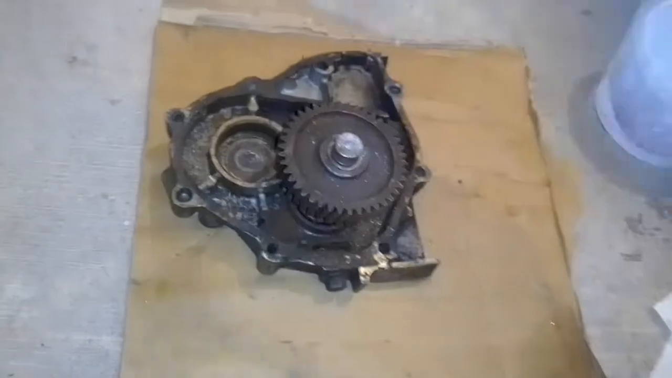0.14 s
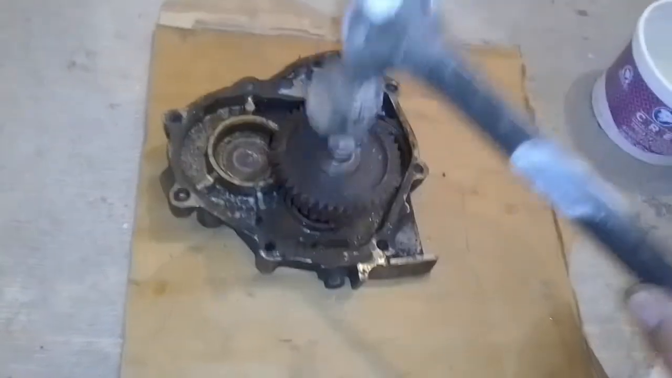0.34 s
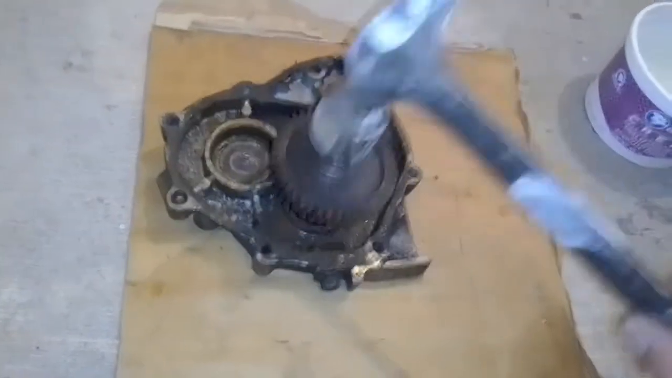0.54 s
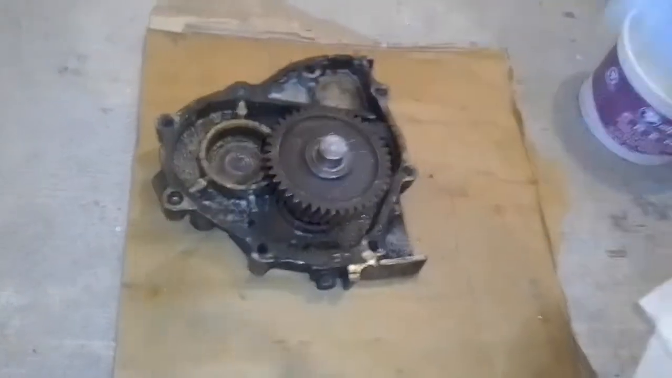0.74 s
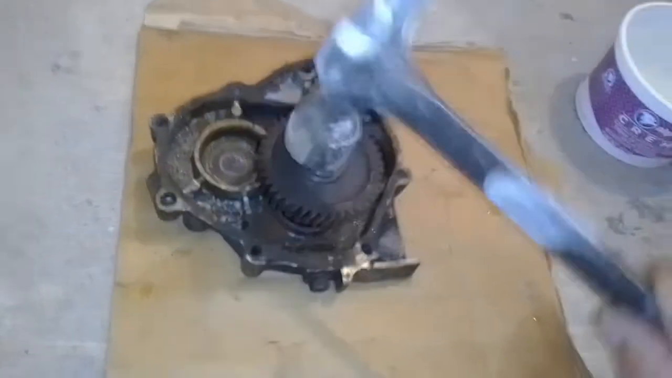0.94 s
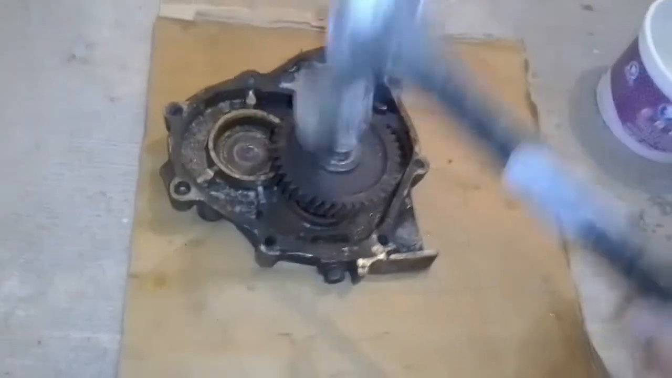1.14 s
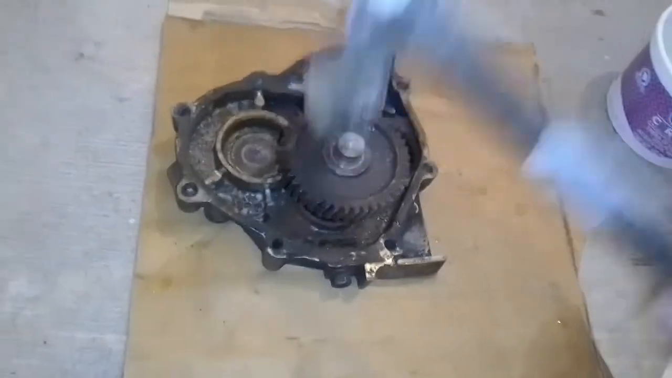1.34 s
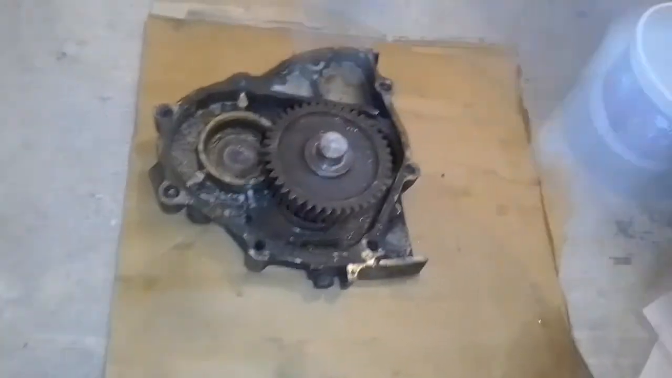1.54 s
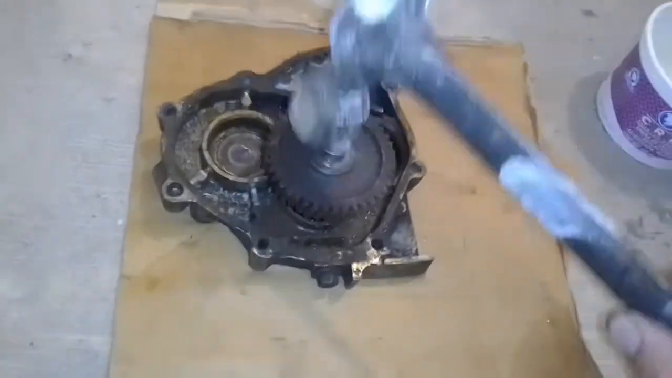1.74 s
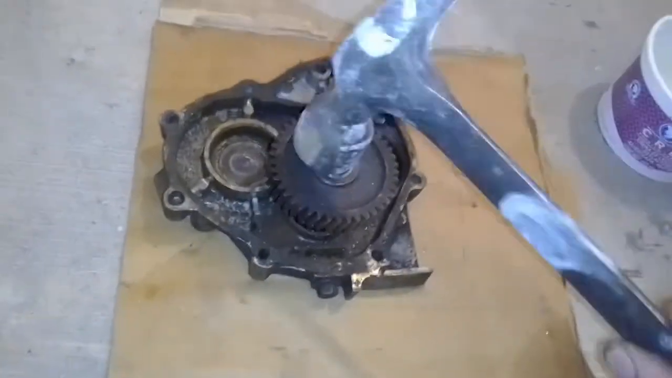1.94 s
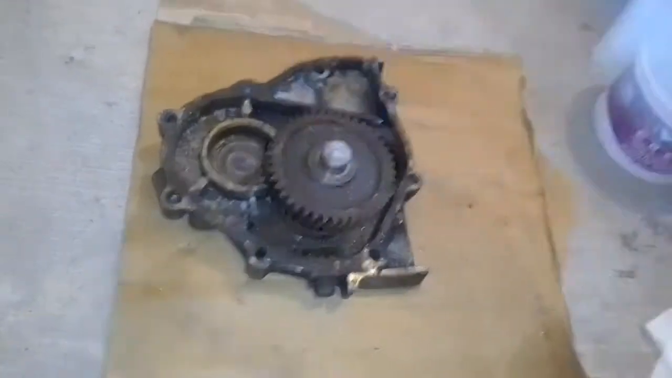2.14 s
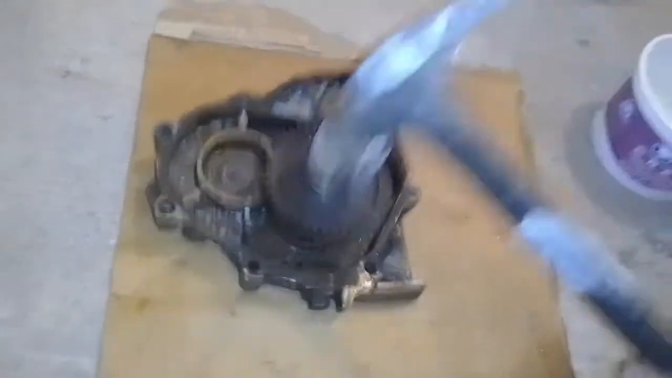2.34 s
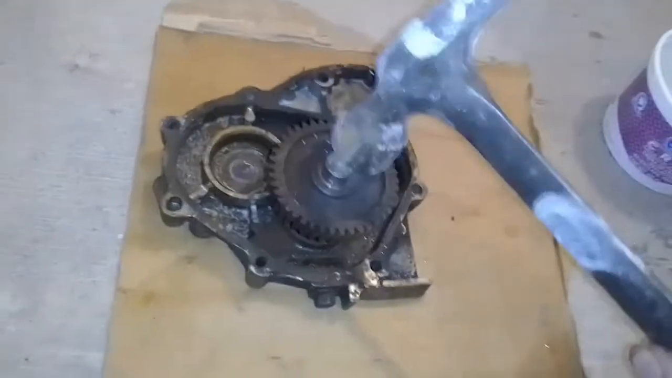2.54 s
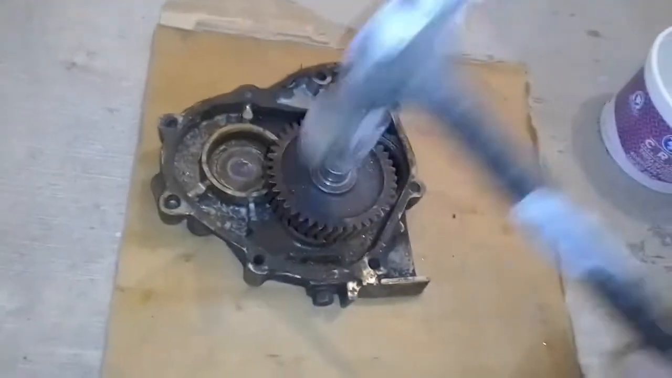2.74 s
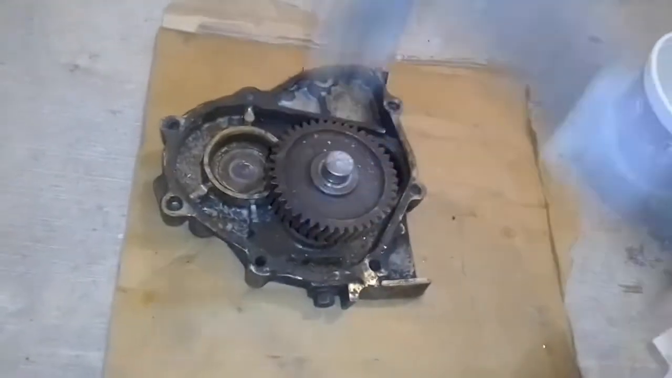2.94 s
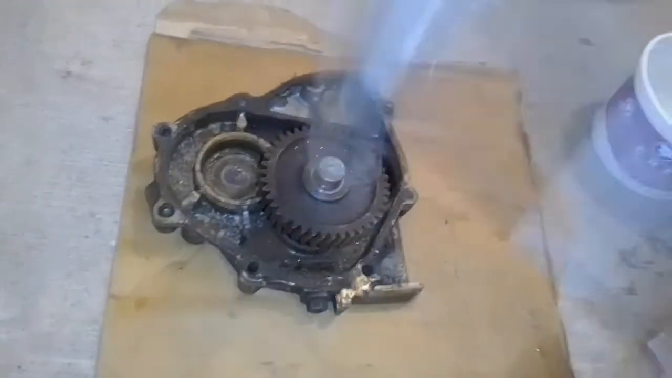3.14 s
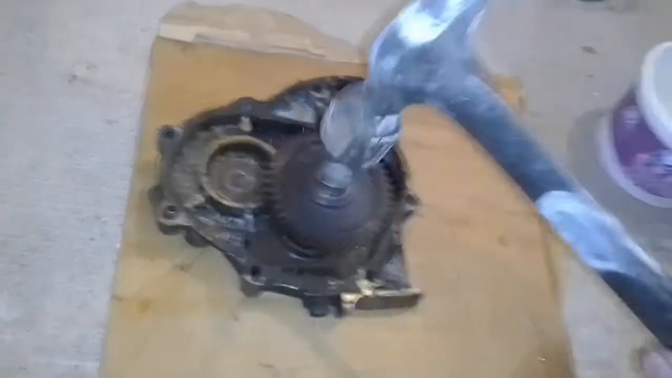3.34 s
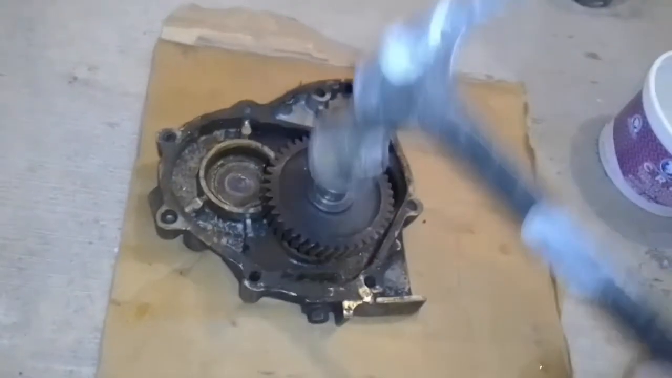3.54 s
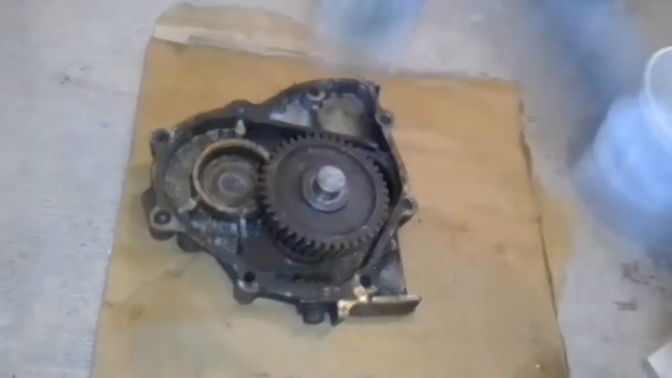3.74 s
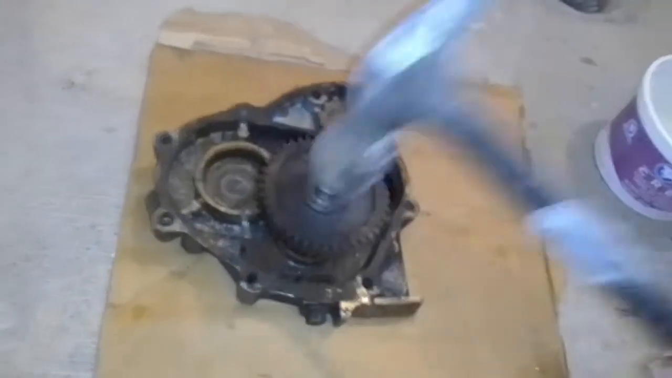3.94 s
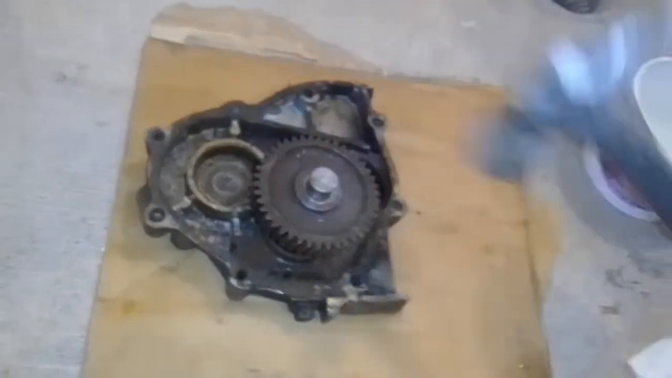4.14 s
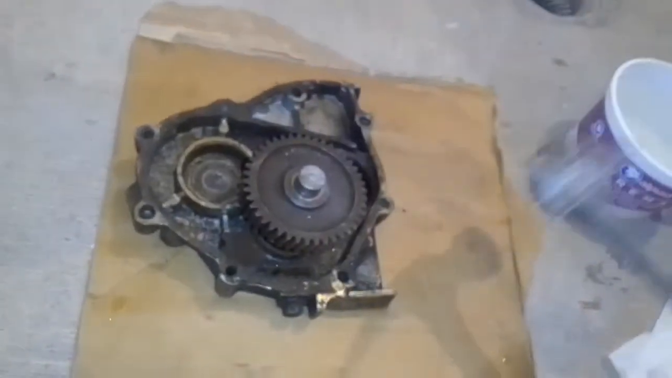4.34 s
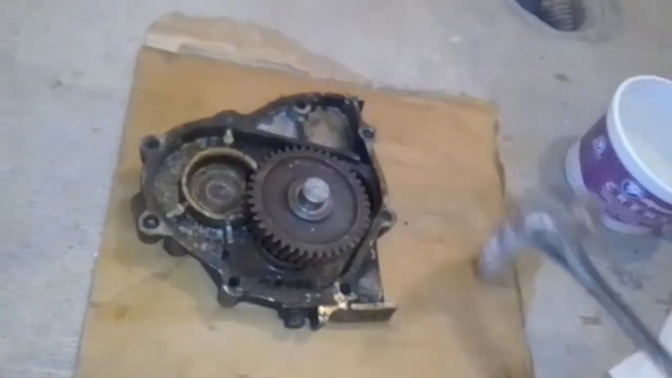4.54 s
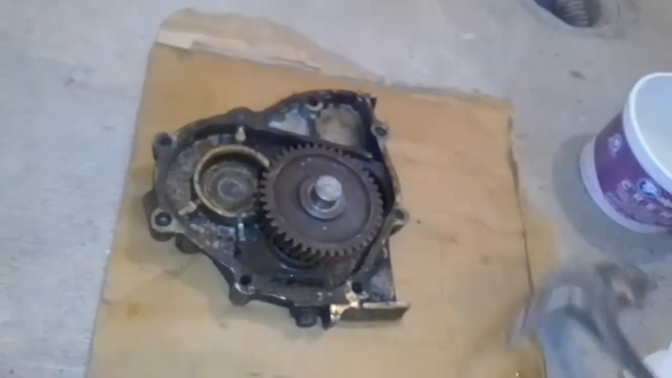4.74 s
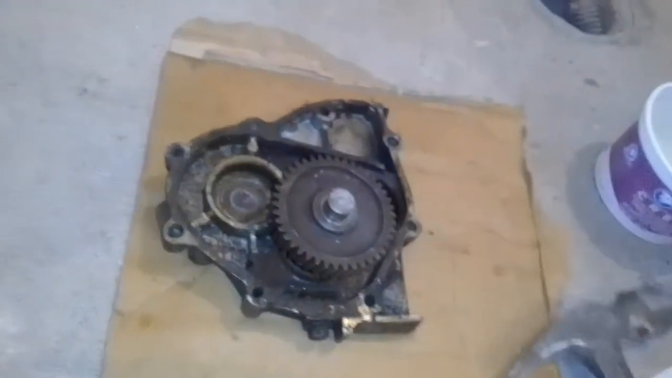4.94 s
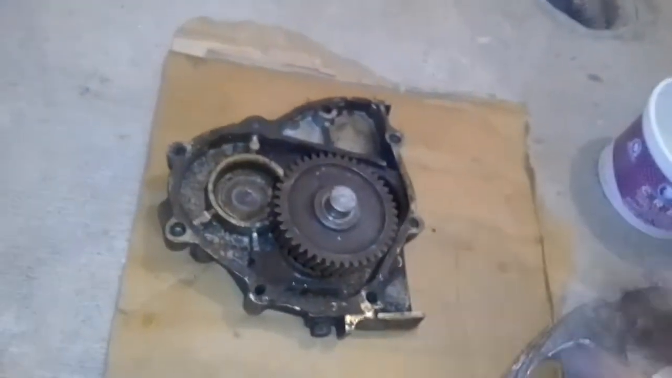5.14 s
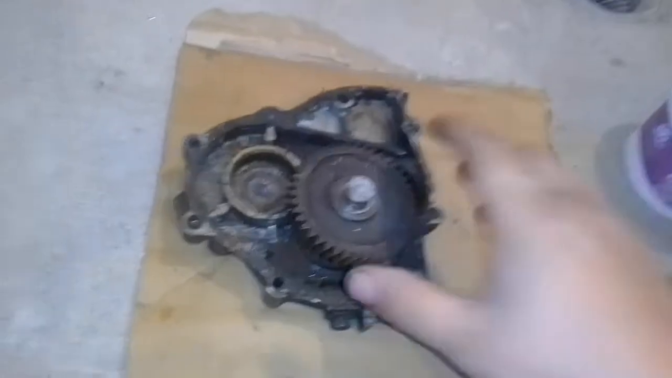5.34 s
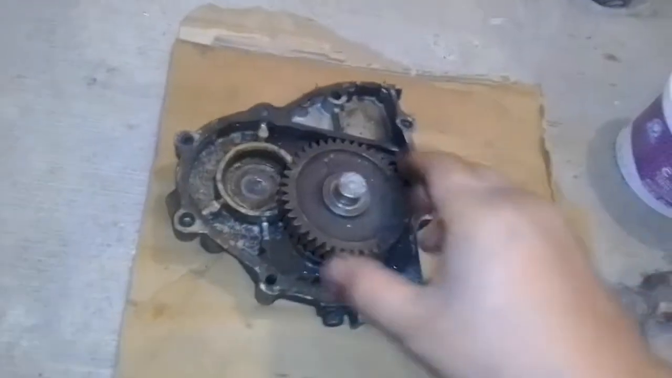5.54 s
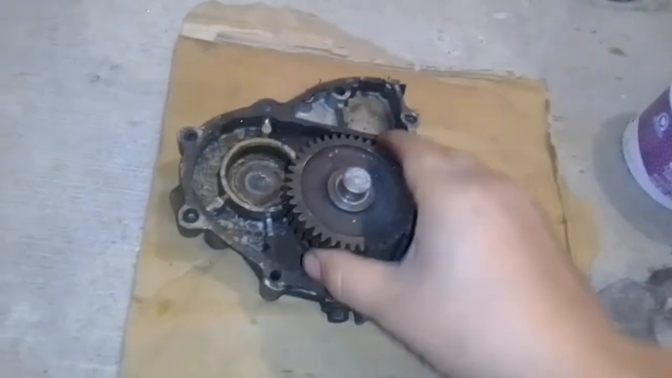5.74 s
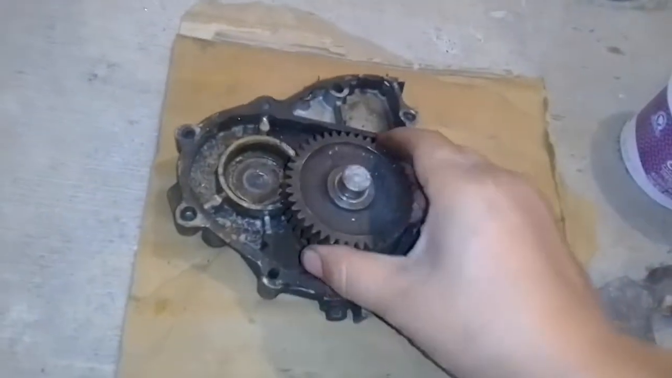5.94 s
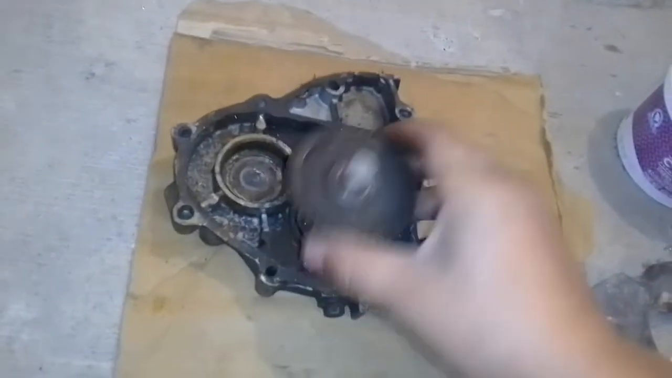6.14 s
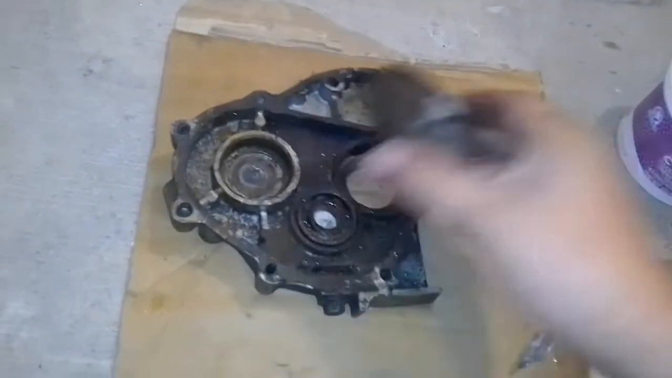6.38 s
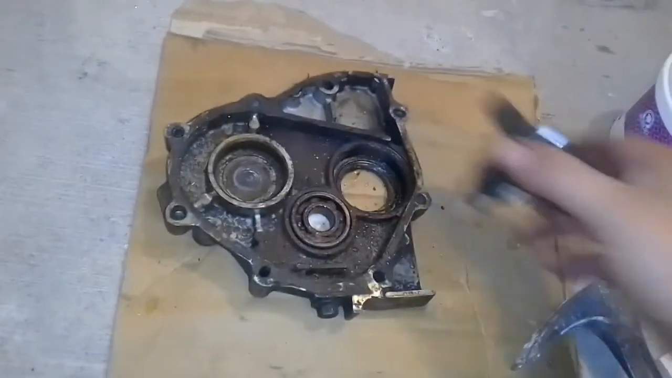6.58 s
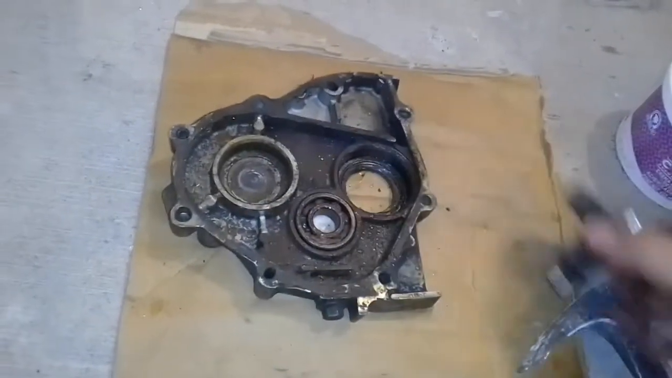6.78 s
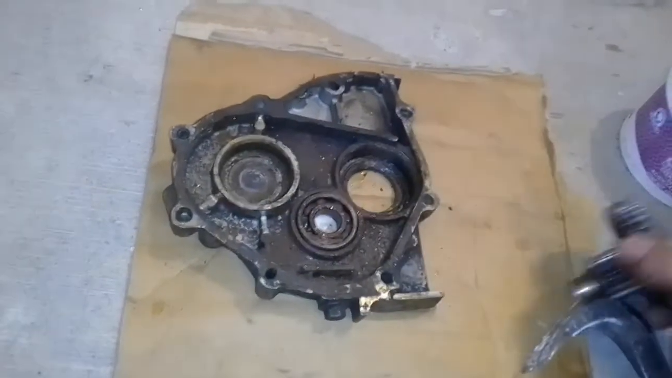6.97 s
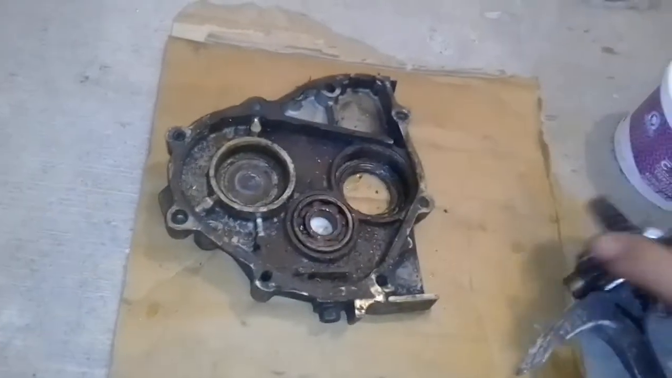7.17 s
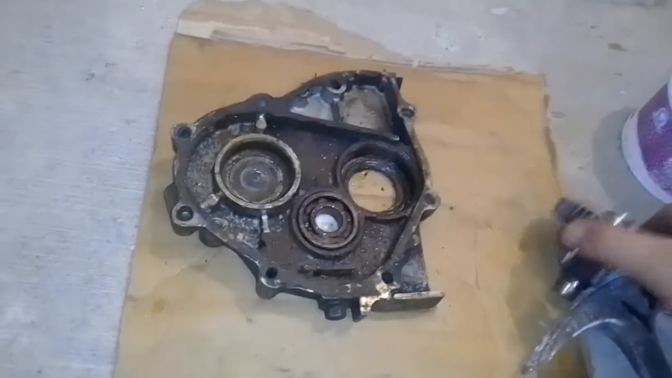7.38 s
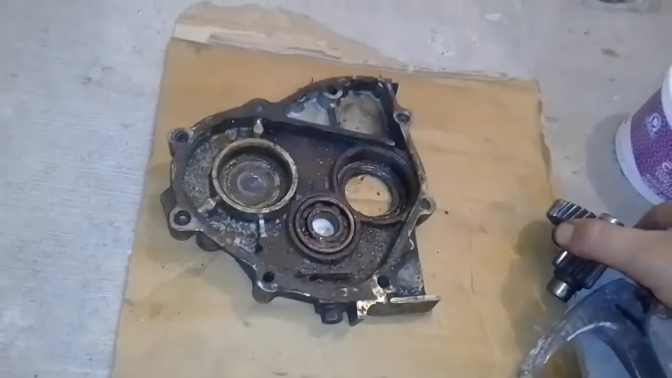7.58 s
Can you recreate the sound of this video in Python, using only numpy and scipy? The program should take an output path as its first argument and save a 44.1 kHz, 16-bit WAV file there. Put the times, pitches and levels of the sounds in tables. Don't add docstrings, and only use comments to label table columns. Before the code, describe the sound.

Six heavy hammer blows ring piercingly on a steel shaft, with light rebound taps between, then dull thuds and small gear clacks in a workshop.

```python
import sys
import numpy as np
from scipy import signal
from scipy.fft import rfft, irfft, next_fast_len
from scipy.io import wavfile
from scipy.ndimage import uniform_filter1d, minimum_filter1d

SR = 44100
rng = np.random.default_rng(int(sys.argv[2]) if len(sys.argv) > 2 else 0)


def elevation(decibels):
    levels = np.asarray(decibels, float)
    return 10 ** (levels / 20)


def wav_record(signal):
    frames = np.transpose(np.atleast_2d(signal))
    bounded = np.clip(frames, -1, 1)
    quanta = np.round(bounded * 32767).astype(np.int16)
    wavfile.write(sys.argv[1], SR, quanta)


N = 335601

# t/s, clatter level/dB, housing boom level/dB, thump level/dB
BLOWS = [
    (0.241, -32.5, -46, -45),
    (0.938, -31, -40, -45),
    (1.643, -26, -32, -40),
    (2.371, -30, -32.5, -43),
    (3.19, -28.5, -29, -42.5),
    (3.826, -29, -33.5, -43),
]
# time until the tone has broken up/s, treble loss/(dB per s), speed of dying,
# head level over clatter/dB, housing wall level over clatter/dB
BLOW_RINGS = [
    (0.078, 200, 1.1, -16, -10),
    (0.06, 180, 1.1, -16, -16),
    (0.027, 60, 1.2, -8.5, -16),
    (0.051, 45, 1.116, -11.5, -12.5),
    (0.04, 90, 1.16, -12.5, -12.5),
    (0.044, 120, 1.12, -8.5, -3),
]
SWELL_STARTS = [.002, 0.0066, 0.029, 0.0075, .008, 0.0014]
# level of the first, second and third mode/dB
HEAD_STRENGTHS = [(-1.5, 1.5, 1), (-5.5, 5.5, 1.5), (4, -4, 3.5), (-3.5, 0, 8), (0, -5, 5), (-7.5, 2.5, 2)]
# t/s, level/dB
SHAFT_LEVELS = [
    [(0.243, -19), (0.291, -9.5), (0.347, -14.5), (0.353, -27.5), (0.365, -17.5), (0.497, -37.5),
     (0.53, -55.5)],
    [(0.94, -21.5), (0.984, -10.5), (1.138, -25.5), (1.2, -47)],
    [(1.645, -21.5), (1.653, -18), (1.691, -13), (1.739, -25), (1.825, -35), (1.853, -47.5), (1.869, -44),
     (1.9, -58)],
    [(2.373, -20.5), (2.377, -17), (2.429, -9), (2.453, -15), (2.463, -9), (2.475, -20.5), (2.631, -43),
     (2.78, -69.5)],
    [(3.192, -19), (3.242, -7.5), (3.264, -18.5), (3.274, -10.5), (3.284, -21.5), (3.314, -18.5),
     (3.32, -27), (3.364, -29), (3.45, -53.5)],
    [(3.828, -20), (3.884, -8), (3.914, -17), (3.92, -10.5), (3.958, -29.5), (3.974, -22), (4.166, -57),
     (4.3, -73)],
]
# first level/dB, swell/s, hold/s, fall/(dB per s)
CLATTER_SHAPE = (-1, 0.0816, 0.0579, 129)
BOOM_SHAPE = (-4.5, 0.01, 0.04, 92)
THUMP_SHAPE = (0, .05, .11, 125)


def heavy_blows():
    out = np.zeros(N)
    for levels, blow, ringing, swell_start_s, modes_db in zip(SHAFT_LEVELS, BLOWS, BLOW_RINGS,
                                                             SWELL_STARTS, HEAD_STRENGTHS):
        start, clatter_db, boom_db, thump_db = blow
        breakup_s, treble_loss_db, speed, head_db, wall_db = ringing
        until_taps = [tap[0] - start for tap in TAPS if tap[0] > start]
        age = np.arange(0, min([.5] + until_taps), 1 / SR)
        echo_age = age + 2 * swell_start_s
        held, duck_db = squeeze(start + age)

        gaps = 1 - .4 * np.exp(-(echo_age / .06) ** 2)
        clatter = housing_clatter(age, gaps, treble_loss_db, head_db, wall_db, modes_db)
        boom = gaps * evened(resonate_twice(rng.standard_normal(len(age)), 1130, 350))
        thump = evened(band(rng.standard_normal(len(age)), 130, 680))

        sound = shaft_ring(start, age, echo_age, held, levels, breakup_s)
        for layer, db, rule in [(clatter, clatter_db, CLATTER_SHAPE), (boom, boom_db, BOOM_SHAPE),
                                (thump, thump_db, THUMP_SHAPE)]:
            sound += elevation(db + duck_db + swell_and_fall(age + swell_start_s, *rule, speed)) * layer
        fade = np.clip(np.minimum(age / .001, (age[-1] - age) / .0018), 0, 1)
        add(out, start, fade * sound)
    return out


def swell_and_fall(age, first_db, swell_s, hold_s, fall_db, speed):
    swell = first_db * np.clip(1 - age / swell_s, 0, 2)
    return swell - speed * fall_db * np.maximum(age - swell_s - hold_s, 0)


# t/s, peak level/dB, low share/dB, top share/dB
JUMPS = [(0.2408, -18.5, -25, -13), (0.2524, -24, -13, -15.5), (0.2598, -21.5, -2, -6),
         (0.2817, -20, -33, -23), (0.3006, -20, -17, -23), (0.3036, -21, -23, -28), (0.3242, -33, -21, -22),
         (0.4228, -43, 6, -30), (0.9381, -22, -9.5, -9), (0.9476, -24, 1, -15), (0.9628, -19, 0.5, -12),
         (0.9714, -16.5, -15, -9), (0.9974, -16.5, -8.5, -13), (1.6432, -11, -15, -17.5),
         (1.6524, -12, -15.5, -12), (1.7234, -32, -10, -14), (2.371, -14, -16.5, -12),
         (2.3745, -18, -25, -12), (2.3834, -15, -9, -11), (2.4105, -18, -13, -6), (2.4378, -27, -14, -24),
         (2.6028, -35, -12, -14), (3.1911, -16.5, -10, -8.5), (3.2035, -18.5, -15.5, -11),
         (3.2095, -15.5, -17, -14), (3.2205, -14.5, -21, -10), (3.2472, -22.5, -8.5, -27.5),
         (3.3723, -28, -5, -9), (3.8255, -19, -13, -11), (3.847, -14, -15.5, -8),
         (3.863, -16.5, -16, -19.5), (3.891, -20.5, -7.5, -15)]


def shaft_ring(start, age, echo_age, held, levels, breakup_s):
    hz = 9470
    pure_s = .045
    rough = np.clip((echo_age - pure_s) / breakup_s, 0, 1) ** 2 * 0.87
    width_hz = 190 * np.sqrt(0.049 / breakup_s)
    echoes = evened(resonate_twice(rng.standard_normal(len(age)), hz, width_hz))
    halo = evened(resonate_twice(rng.standard_normal(len(age)), 9750, 1200))
    tone = np.sqrt(2) * np.sin(2 * np.pi * hz * age)
    echoes = evened(echoes + .2 * halo) + 1.6 * held * tone

    power = abs(signal.hilbert(echoes)) ** 2 / 2 + .06
    flatness = np.maximum(1 - rough, held)
    shaft = echoes / power ** (flatness / 2) * elevation(np.interp(start + age, *np.transpose(levels)))
    notch_s = .0026
    for s, *_ in JUMPS:
        if s > start + .004:
            shaft = shaft * (1 - .6 * np.exp(-((start + age - s - notch_s) / notch_s) ** 2))
    return shaft


# f/Hz, level/dB per Hz
CLATTER = [(88, -78.5), (150, -49.5), (209, -29), (559, -16.5), (766, -30.5), (1090, -24.5), (1440, -12.5),
           (2750, -12), (5790, -21.5), (6140, -27), (8250, -19.5), (9650, -4), (10900, -24.5),
           (16400, -63.5)]
# f/Hz, level/dB, t60/s
HEAD = [(5033, 0, .36), (5658, 0, .26), (7855, -12, .12), (4344, -4, .3), (5052, -5, .36)]


def housing_clatter(age, gaps, treble_loss_db, head_db, wall_db, modes_db):
    lumps = elevation(2 * evened(uniform_filter1d(rng.standard_normal(len(age)), 200)))
    clatter = colour(rng.standard_normal(len(age)), CLATTER) * lumps
    clatter /= band_rms(clatter, 1500, 7500)
    strike = rng.standard_normal(len(age))
    for (hz, *_), db in zip(HEAD, modes_db):
        clatter += elevation(head_db + db - 40 * age) * evened(resonate(strike, hz, 18))
    treble = colour(clatter, [(10800, -50), (12500, 0)])
    wall = elevation(wall_db) * evened(resonate(strike, 2800, 150))
    return gaps * (clatter - treble + wall) + treble * elevation(6 - treble_loss_db * age)


# t/s, length/s, duck level/dB
SQUEEZES = [(0.242, 0.0078, -5.5), (.265, 0.014, -7.5), (0.285, 0.012, -8), (.31, 0.01, -5),
            (0.954, .008, -5.5), (0.976, 0.015, -4), (1.003, 0.0089, -8), (1.647, 0.0045, -5.5),
            (1.653, 0.0056, -3), (2.373, .007, -5), (2.401, 0.006, -0.5), (2.415, 0.017, -7),
            (2.46, 0.0083, -3), (3.195, .007, -5), (3.237, .01, -8.5), (3.27, 0.0058, -2.5),
            (3.832, .011, -4.5), (3.858, 0.0056, -2.5), (3.875, 0.014, -8), (3.915, .006, -1.5)]


def squeeze(t):
    held = [np.clip(np.minimum(t - s, s + length_s - t) / .0012, 0, 1) for s, length_s, _ in SQUEEZES]
    return np.max(held, axis=0), np.transpose(SQUEEZES)[2] @ held


# f/Hz, level/dB per Hz
JUMP_COLOUR = [(150, -3.5), (1000, -0.5), (2500, -5.5), (6000, -7), (10000, 7.5), (12000, -4), (16000, -12)]


def housing_jumps():
    return dry_cracks(JUMPS, JUMP_COLOUR, t60=.016, low_offset_db=8.3, top_offset_db=3)


# t/s, peak level/dB, f/Hz
CLANGS = [(0.3016, -31.5, 1130), (0.9694, -29, 1080), (0.9974, -24.5, 1073), (1.6753, -23, 1301),
          (1.6997, -19.5, 1140), (2.3839, -27, 1100), (2.4097, -19, 987), (2.4384, -19, 1134),
          (2.5019, -27.5, 1100), (3.218, -19, 1023), (3.248, -17.5, 1080), (3.3207, -24.5, 1110),
          (3.8506, -25.5, 1000), (3.868, -25.5, 991), (3.898, -19.5, 1150), (3.929, -24, 994)]
# t/s, level/dB, f/Hz, t60/s
PINGS = [(1.651, -22, 2150, 0.017), (2.397, -26.5, 1900, .03), (2.915, -34.5, 1256, 0.025),
         (3.216, -23.5, 1850, 0.029), (3.23, -26.5, 2720, .03), (4.889, -35.5, 2000, 0.042),
         (4.9, -33.5, 939, 0.16), (4.942, -38, 2000, .04), (5.081, -23, 826, .09), (5.083, -28, 436.4, .3),
         (5.084, -29, 950, 0.19), (5.17, -27, 1265, .06), (5.171, -27.5, 436, 0.37),
         (5.171, -30.5, 850, .1), (6.857, -39.5, 960, 0.33), (6.886, -42, 940, 0.28),
         (7.2, -47, 1005, 0.17), (7.301, -42, 998, .15), (7.431, -40.5, 847, 0.13), (7.433, -46, 1400, .1),
         (6.177, -62.5, 2700, .06), (6.178, -66, 3750, .05), (7.171, -51, 2400, .03),
         (7.176, -62, 5100, .05), (7.2, -48, 2500, .03), (7.302, -55, 4670, .06), (7.301, -51, 3600, .05),
         (7.388, -63, 3200, .05), (7.433, -52, 5300, .04), (7.458, -53, 7840, .06),
         (7.463, -58.5, 5500, .04), (7.458, -56, 3700, .04), (7.492, -62, 3800, .04)]


def clangs_and_pings():
    out = np.zeros(N)
    t60 = .055
    for s, db, hz in CLANGS:
        add(out, s, elevation(db + .5) * ring([(hz, 0, t60), (hz * 1.09, -6, t60), (2800, -10, .04)]))
    for s, db, hz, ping_t60 in PINGS:
        add(out, s, elevation(db) * ring([(hz, 0, ping_t60)]))
    duck_db = squeeze(np.arange(N) / SR)[1]
    return out * elevation(duck_db) + elevation(-24) * room(out)


# t/s, peak level/dB, ring level/dB, low share/dB, treble share/dB
TAPS = [
    (0.545, -3.5, -8.5, -18, -4.5),
    (1.2195, -3, -14, -18, -7),
    (1.9218, -1, -18.5, -17.5, -4),
    (2.795, -3, -11, -16, -9.5),
    (3.4694, -2.5, -17, -17.5, -6.5),
]
# quick chime level/dB, lasting chime level/dB, upper chime level/dB
CHIMES = [(-20.5, -39, -39.5), (-19.5, -39, -42), (-17, -35.5, -39.5), (-26.5, -33.5, -30),
          (-24.5, -36, -32.5)]
# f/Hz, level/dB per Hz
TAP_COLOUR = [(88, -46), (150, -9), (451, 1.5), (629, -8.5), (1410, -11.5), (1850, -6), (4670, -6.5),
              (4950, -5), (6140, -16), (8410, -17.5), (9650, -4.5), (12500, -22), (15500, -38),
              (16400, -45)]
# f/Hz, level/dB, t60/s
SHAFT = [(9470, 2.5, 0.096), (9478, -9.5, .3), (9430, -3.5, .12), (9911, -3, .05), (9680, -5, .06)]
# f/Hz, level/dB, t60/s
HOUSING = [(438, -16, .05), (1005, -2.5, 0.059), (1855, -4, .1), (1990, -8, 0.12), (2267, -6, .2),
           (2406, -3.5, .06), (2650, -5.5, .15), (2890, 3, 0.045)]
# f/Hz, level/dB, t60/s
GRIPPED_HEAD = [(5028, 0, .1), (4300, -9.5, .15)]


def light_taps():
    cracks, rings = np.zeros((2, N))
    click = [(2900, 0, .006), (1934, -5.5, .01), (3800, -6.5, .008)]
    for (s, db, ring_db, low_db, top_db), (quick_db, lasting_db, upper_db) in zip(TAPS, CHIMES):
        add(cracks, s, elevation(db - 2) * ring(click))
        add(cracks, s, elevation(db - 10) * crack(TAP_COLOUR, .024, 930, low_db + 12, 12000, top_db, echo_db=-13))
        add(rings, s, elevation(db + ring_db - 4) * ring(SHAFT))
        add(rings, s, elevation(quick_db) * ring(GRIPPED_HEAD))
        add(rings, s, elevation(lasting_db) * ring(HEAD[:1] + HEAD[2:]))
        add(rings, s, elevation(upper_db) * ring(HEAD[1:2]))
        add(rings, s, elevation(db - 24) * ring(HOUSING))
    return cracks + rings + elevation(-12) * room(rings)


# t/s, peak level/dB, bright share/dB, low share/dB, echo level/dB
THUDS = [(0.664, -46.5, -16.5, -7.5, -5), (1.417, -44, -12.5, -8.5, -14.5), (2.116, -44.5, -20.5, -11, -10),
         (2.915, -32, -19.5, -16.5, -15), (3.584, -35, -16.5, -23.5, -11.5),
         (4.745, -46.5, -13, -11.5, -13.5), (4.792, -58, -4.5, -11, -17), (4.889, -26, -12.5, -17, -15),
         (4.902, -24, -16, -18.5, -15.5), (4.94, -24.5, -27, -12.5, -18), (5.08, -13, -22.5, -15, -12),
         (5.093, -20.5, -23, -2, -22), (5.168, -17.5, -23.5, -9, -13)]
# f/Hz, level/dB per Hz
THUD_COLOUR = [(150, -26), (210, -15), (425, -2), (680, -10), (950, -5), (1300, -11), (2400, -18.5),
               (3600, -24), (6500, -35), (8500, -26.5), (10300, -17.5), (11500, -38.5), (16400, -53)]
# f/Hz, level/dB, t60/s
HANDLE = [(436, -4, .2), (820, 0, .12), (968, -6, .12), (1290, -8, .12), (1567, -12, .1), (2300, -10, .08)]


def hammer_thuds():
    out = knocks(THUDS, THUD_COLOUR, HANDLE, t60=.023, ring_db=-14.5, low_offset_db=7.6, bright_offset_db=12)
    add(out, THUDS[5][0], elevation(-56) * ring(GRIPPED_HEAD[1:]))
    return out


# t/s, peak level/dB, bright share/dB, low share/dB, echo level/dB
KNOCKS = [
    (6.856, -28.5, 4.5, -39.5, -12),
    (6.885, -31.5, -5, -27, -11.5),
    (7.128, -59, -20.5, -9, -8),
    (7.17, -37, -13.5, -20, -12),
    (7.2, -39, -25, -14, -15),
    (7.28, -32.5, -26, -12, -24),
    (7.301, -32.5, -16.5, -15, -28),
    (7.393, -53, -13, 3.5, -11),
    (7.43, -28, -7, -33, -17.5),
    (7.456, -43, -4, -20, -28),
]
# f/Hz, level/dB per Hz
KNOCK_COLOUR = [(150, -39), (440, -22.5), (750, -16.5), (970, -1.5), (1400, -22), (2100, -18),
                (4400, -15.5), (6400, -25.5), (7750, -17.5), (8700, -27.5), (9800, -17), (11500, -32),
                (16400, -60.5)]
# f/Hz, level/dB, t60/s
GEAR = [(961, -10, 0.21), (921, 6, 0.13), (449, -11, 0.2), (1406, 2, 0.096)]


def gear_knocks():
    return knocks(KNOCKS, KNOCK_COLOUR, GEAR, t60=.036, ring_db=-16, low_offset_db=18, bright_offset_db=2.3)


# t/s, peak level/dB, low share/dB, top share/dB
TICKS = [(4.9894, -55.5, 7, 15), (5.93, -65, -5, -2.5), (6.0287, -66, -3, -1.5), (6.066, -66, -2, 0),
         (6.0774, -61.5, 0.5, -2), (6.129, -45, -12, 2.5), (6.1796, -64, -14, -10), (6.3465, -65, 1, -5),
         (7.3876, -66, 20.5, 1)]
# f/Hz, level/dB per Hz
TICK_COLOUR = [(150, -4), (3000, -3.5), (7000, 0), (10000, 2), (12500, -16), (16000, -22)]


def finger_ticks():
    return dry_cracks(TICKS, TICK_COLOUR, t60=.023, low_offset_db=0, top_offset_db=4.5)


# t/s, low tone level/dB, upper tones level/dB
RUB = [(6.95, -70, -58), (7.04, -78, -61), (7.174, -64.5, -60.5), (7.342, -59, -55.5), (7.372, -57, -59),
       (7.494, -67.5, -70), (7.61, -78.5, -68)]
# f/Hz, level/dB
RUB_TONES = [(680, 4), (870, 1), (1030, 5), (1270, -3), (1420, -27)]


def gear_rub():
    out = np.zeros(N)
    s, low_db, upper_db = np.transpose(RUB)
    t = np.arange(s[0], s[-1], 1 / SR)
    noise = rng.standard_normal(len(t))
    upper = evened(sum(elevation(db) * resonate(noise, hz, 29.1) for hz, db in RUB_TONES))
    low = evened(resonate(resonate(noise, 400, 83), 400, 82))
    add(out, s[0], elevation(np.interp(t, s, low_db)) * low + elevation(np.interp(t, s, upper_db) - 1.5) * upper)
    return out


SHAKES = [-43.5, -43, -49, -47.5, -50, -48]


def floor_shake():
    out = np.zeros(N)
    t = np.arange(SR // 4) / SR
    for (s, *_), db in zip(BLOWS, SHAKES):
        envelope = elevation(db - 60 * t / .19) * (1 - np.exp(-t / .0072))
        add(out, s, envelope * evened(band(rng.standard_normal(len(t)), 30, 130)))
    return out


# middle t/s, half length/s, lift of the air/dB, lift of its top/dB
BRUSHES = [
    (0, .6, -2.5, 9),
    (4.55, 1, 0.5, 6.5),
    (4.945, .14, 11.5, 8.5),
    (5.15, 0.14, 16, -1),
    (5.6, 0.52, -0.5, 5),
    (6.506, 0.85, -1.5, 11.5),
    (7.351, .12, 5, -1),
    (7.476, 0.096, 10, 17),
]
# f/Hz, level/dB per Hz
AIR = [(15, -44.5), (25, -27), (65, -6.5), (111, -16), (146, -53.5), (213, -5), (258, -16), (508, -13),
       (949, -12), (1630, -16), (3400, -29), (7880, -41), (10100, -27), (15100, -54), (16400, -54.5)]


def workshop_air():
    t = np.arange(N) / SR
    near = [np.clip(1 - abs(t - s) / half_s, 0, 1) for s, half_s, *_ in BRUSHES]
    lift_db, rustle_db = np.transpose(BRUSHES)[2:] @ near
    noise = colour(rng.standard_normal(N), AIR)
    noise /= band_rms(noise, 370, 2000)
    top = colour(noise, [(3500, -40), (6000, 0)])
    return elevation(-70 - 2 * gain_held() + lift_db) * (noise - top + top * elevation(rustle_db))


RECOVER_S = (3.97, 5.5)


def gain_held():
    return np.interp(np.arange(N) / SR, RECOVER_S, [1, 0])


# f/Hz, level/dB
HUM = [(64.6, -75)]


def hum():
    held = gain_held()
    return sum(elevation(db - 5.5 * held) * evened(resonate(rng.standard_normal(N), hz, 6)) for hz, db in HUM)


# t/s, length/s, from f/Hz, to f/Hz, level/dB
ENGINE = [
    (2.451, 1.17, 78.6, 108.7, -70),
    (3.9, 0.43, 122.5, 152, -68),
    (4.25, 0.37, 112, 107, -73.5),
    (5.9, 0.66, 104, 92, -80),
]


def rumble_and_engine():
    low = elevation(-83.5) * evened(resonate_twice(rng.standard_normal(N), 108, 35))
    for s, length_s, from_hz, to_hz, db in ENGINE:
        u = np.arange(0, length_s, 1 / SR) / length_s
        hz = from_hz + (to_hz - from_hz) * u
        note = evened(resonate(rng.standard_normal(len(u)), hz, 7.8))
        add(low, s, elevation(db) * np.sin(np.pi * u) ** .5 * note)
    return low


def dry_cracks(events, spectrum, t60, low_offset_db, top_offset_db):
    out = np.zeros(N)
    for s, db, low_db, top_db in events:
        burst = crack(spectrum, t60, 1600, low_db + low_offset_db, 7400, top_db + top_offset_db)
        add(out, s, elevation(db - 4.5) * burst)
    return out


def knocks(events, spectrum, modes, t60, ring_db, low_offset_db, bright_offset_db):
    out = np.zeros(N)
    for s, db, bright_db, low_db, echo_db in events:
        burst = crack(spectrum, t60, 650, low_db + low_offset_db, 2500, bright_db + bright_offset_db, echo_db)
        add(out, s, elevation(db - 3.5) * burst)
        detuned = [(hz * rng.uniform(.96, 1.03), *rest) for hz, *rest in modes]
        add(out, s, elevation(db + ring_db) * ring(detuned))
    return out


def ring(modes):
    t = np.arange(SR // 2) / SR
    out = np.zeros(len(t))
    for hz, db, t60 in modes:
        weaker, phase = rng.random(2)
        out += elevation(db - 1.4 * weaker - 60 * t / t60) * np.sin(2 * np.pi * (hz * t + phase / 2))
    return out * (1 - np.exp(-t / .00015))


def crack(spectrum, t60, low_hz, low_db, high_hz, high_db, echo_db=-90):
    t = np.arange(SR // 2) / SR
    tilt = [(low_hz * .75, low_db), (low_hz * 1.2, 0), (high_hz * .8, 0), (high_hz * 1.2, high_db)]
    noise = colour(colour(rng.standard_normal(len(t)), spectrum), tilt)
    noise /= band_rms(noise, low_hz, high_hz)
    burst = noise * elevation(-60 * t / max(t60, .004)) * (1 - np.exp(-t / .00011))
    if echo_db < -60:
        return burst
    echoes = die_by_band(noise[::-1])[:len(t)]
    return burst + elevation(echo_db) * echoes * (1 - np.exp(-t / .006))


def room(x):
    echoes = np.zeros(SR // 2)
    at = np.arange(300, len(echoes) - 20, 20)
    echoes[at + rng.integers(0, 20, len(at))] = rng.choice([-1., 1.], len(at))
    tail = die_by_band(echoes)
    return signal.fftconvolve(x, tail / np.linalg.norm(tail))[:N]


# f/Hz, t60/s
ROOM = [(250, 0.53), (660, 0.3), (1740, 0.41), (4590, 0.29), (12100, 0.32)]


def die_by_band(x):
    hz, t, z = signal.stft(x, SR, nperseg=256)
    decay = elevation(-60 * t / read(ROOM, hz)[:, None])
    return signal.istft(z * decay, SR, nperseg=256)[1]


def resonate(x, hz, width_hz):
    turn = np.exp(2j * np.pi * np.cumsum(hz * np.ones(len(x))) / SR)
    r = np.exp(-np.pi * width_hz / SR)
    return 2 * (turn * signal.lfilter([1 - r], [1, -r], x / turn)).real


def resonate_twice(x, hz, width_hz):
    return resonate(resonate(x, hz, width_hz), hz, width_hz)


def colour(x, spectrum):
    size = next_fast_len(len(x))
    gain = elevation(read(spectrum, np.fft.rfftfreq(size, 1 / SR)))
    return irfft(rfft(x, size) * gain, size)[:len(x)]


def read(points, hz):
    f, value = np.transpose(points)
    return np.interp(np.log(hz + 1), np.log(f + 1), value)


def band(x, lo_hz, hi_hz):
    return signal.sosfilt(signal.butter(2, [lo_hz, hi_hz], "bandpass", fs=SR, output="sos"), x)


def band_rms(x, lo_hz, hi_hz):
    return np.std(band(x, lo_hz, hi_hz))


def evened(x):
    return x / np.sqrt(np.mean(x ** 2) + 1e-20)


def add(mix, s, sound):
    part = mix[round(s * SR):][:len(sound)]
    part += sound[:len(part)]


# f/Hz, level/dB
HITS_TOP = [(15900, 0), (16300, -35), (17000, -60)]
# f/Hz, level/dB
GAP = [(130, 2), (150, -11.5), (180, -9.5), (200, 0.5)]


def scene():
    hits = heavy_blows() + housing_jumps() + clangs_and_pings() + light_taps()
    hits += hammer_thuds() + gear_knocks() + finger_ticks() + gear_rub()
    low_cut = signal.cheby2(6, 30, 158, "highpass", fs=SR, output="sos")
    hits = signal.sosfilt(low_cut, hits)
    background = workshop_air() + hum() + rumble_and_engine()
    return (colour(hits, HITS_TOP) + floor_shake() + colour(background, GAP))[None]


def dip(events, depth_db, ahead_s):
    t = np.arange(N) / SR
    return sum(depth_db * np.clip(1 - (s - t) / ahead_s, 0, 1) ** .5 * (t < s) for s, *_ in events)


def roll_off(x):
    return signal.sosfilt(signal.butter(12, 16990, fs=SR, output="sos"), x)


def record(dry):
    dip_db = dip(BLOWS, 8, .034) + dip(TAPS, 14, .045)
    cap = minimum_filter1d(np.minimum(1, .66 / (abs(dry) + 1e-9)), size=61)
    mix = dry * elevation(-dip_db) * uniform_filter1d(cap, size=31)
    return roll_off(mix)


dry = scene()
out = record(dry)
wav_record(out)
```